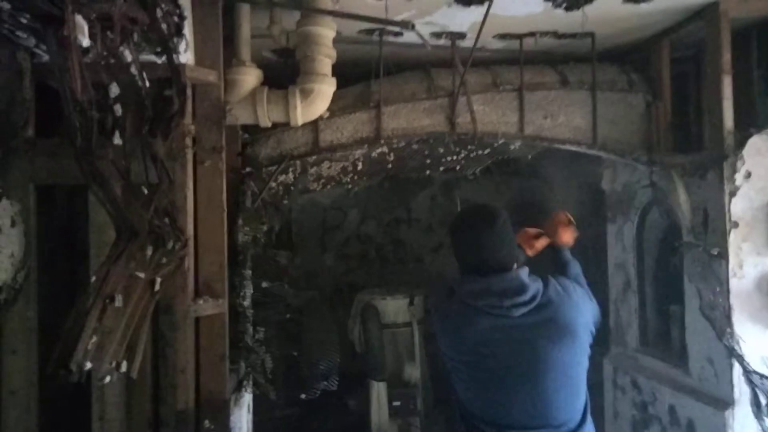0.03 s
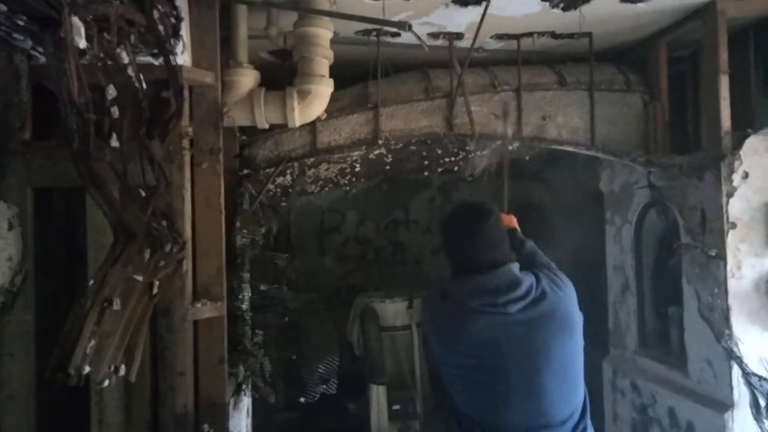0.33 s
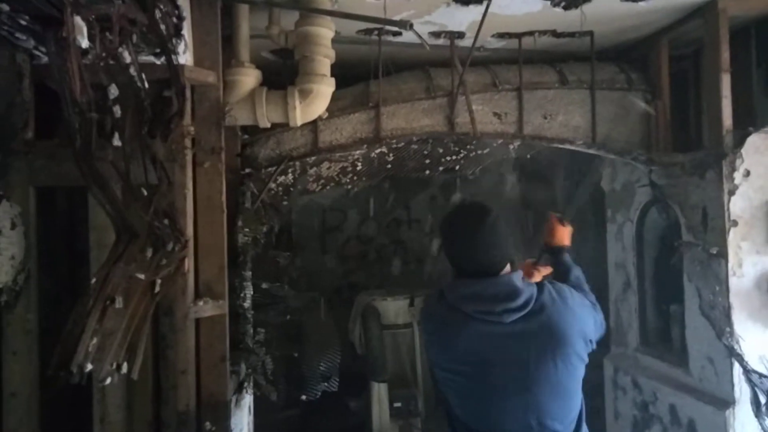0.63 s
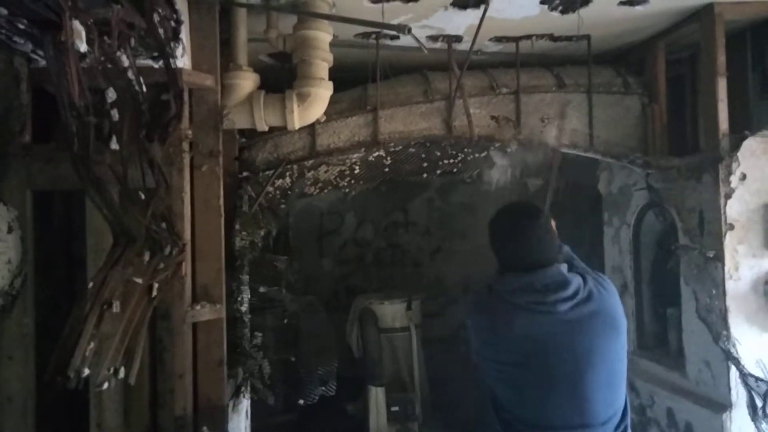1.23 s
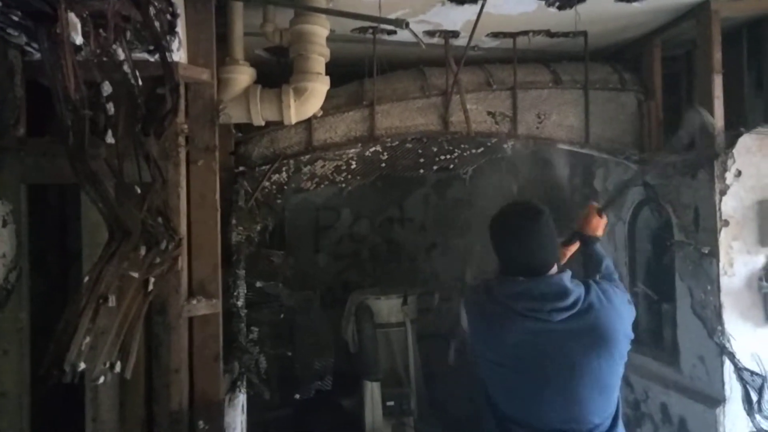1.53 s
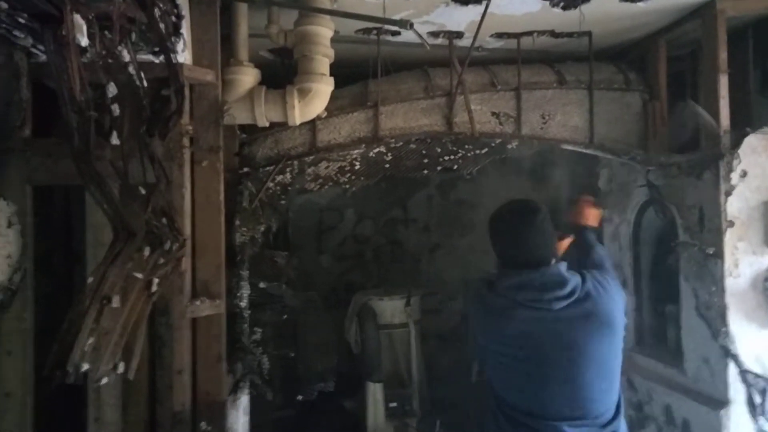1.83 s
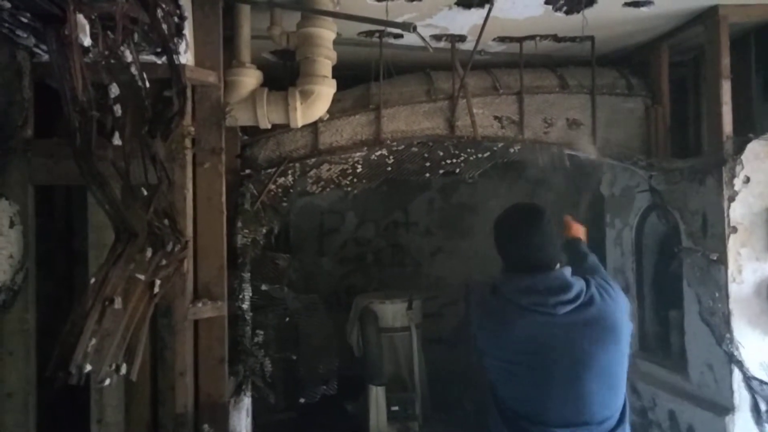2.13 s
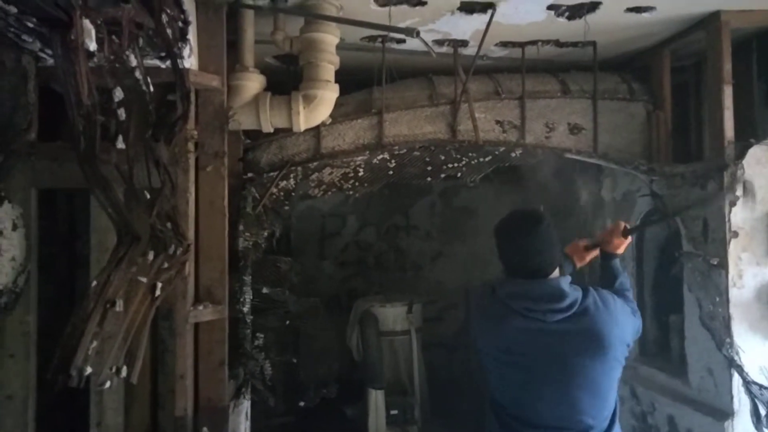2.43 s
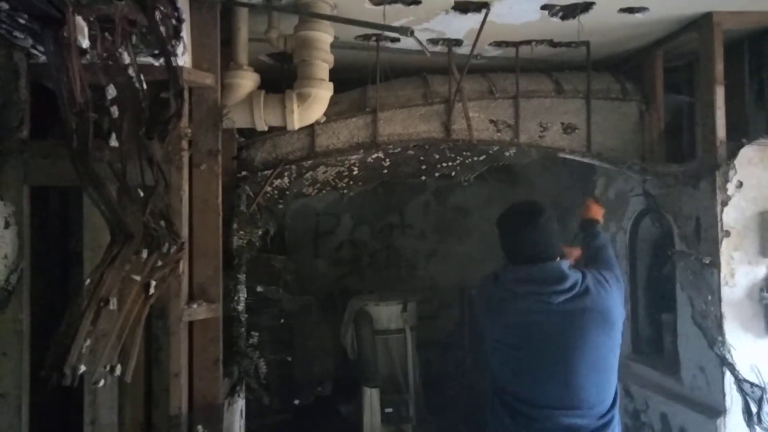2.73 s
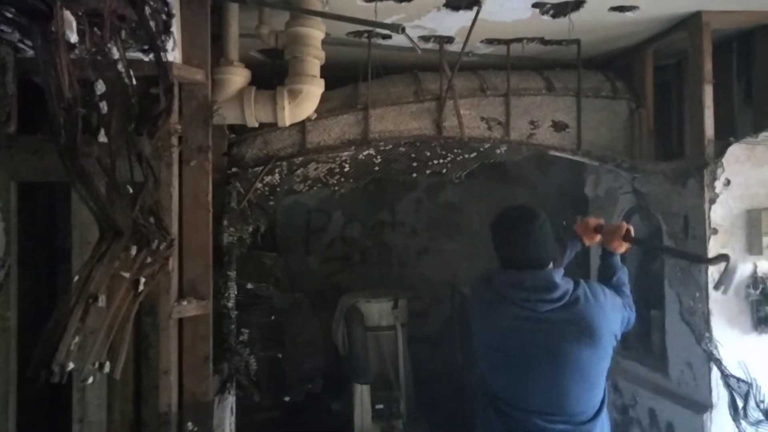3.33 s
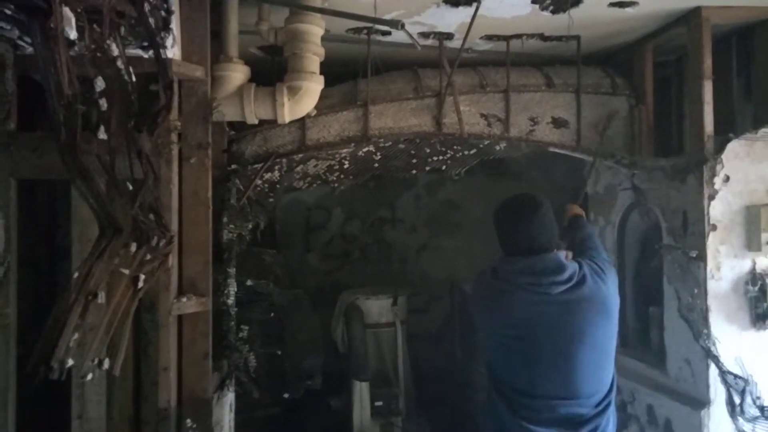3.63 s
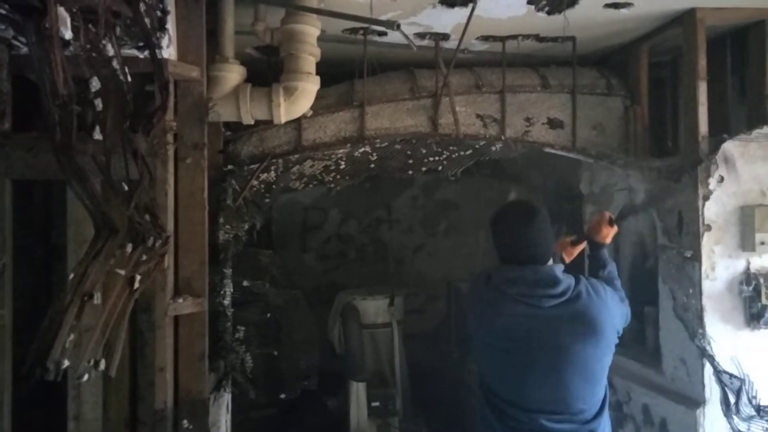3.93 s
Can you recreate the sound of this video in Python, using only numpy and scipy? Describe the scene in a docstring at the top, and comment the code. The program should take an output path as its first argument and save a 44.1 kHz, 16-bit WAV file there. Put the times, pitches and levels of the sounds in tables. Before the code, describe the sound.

A long hand tool crunches and thuds into a plaster wall five times, a little under a second apart. Between blows, lumps shatter on rubble, hard pieces clink and grit trickles down in a bare room.

```python
"""In a bare, derelict room, bits of wall are already falling when a long hand tool hits the plaster.
The blow crunches and thuds, and the masonry rings and booms. Then loosened lumps fall and shatter
on the rubble, hard pieces clink, small chips tick close by and grit trickles down. Four more swings
follow, a little under a second apart; the last three each strike twice in quick succession.
Throughout, the right microphone sounds much brighter than the left."""
import sys
import numpy as np
from scipy import signal
from scipy.fft import rfft, irfft
from scipy.io import wavfile
from scipy.ndimage import uniform_filter1d

SR = 44100
rng = np.random.default_rng(int(sys.argv[2]) if len(sys.argv) > 2 else 0)


def unload_wav(signal):
    """Save mono or channel-first audio to the path in sys.argv[1] as 16-bit WAV at rate SR, clipped to [-1, 1]."""
    wavfile.write(
        sys.argv[1],
        SR,
        np.round(np.clip(np.atleast_2d(signal).T, -1, 1) * 32767).astype(np.int16),
    )


N = 176400
SIZE = 32768  # samples in one event
T, HZ = np.arange(SIZE) / SR, np.fft.rfftfreq(SIZE, 1 / SR)  # its times and frequencies
EVENT_GAIN = np.sqrt(0.03 * SR)  # gives a unit-energy sound the energy of 0.03 s at 0 dB


def blows():
    """The tool crushes and splinters the plaster; the wall thumps, knocks, rings and booms."""
    # Each row: start in seconds, level in dB, bass, crack and treble boosts in dB,
    # pitch of the hollow spot in Hz, knock pitch in Hz, knock boost in dB.
    hits = [(0.3045, -11.5, 1.5, 1, -2, 255, 574, -1), (1.199, -11.5, 3, 4, 4.5, 246, 970, -5.5),
            (2.034, -18.5, 8, -6, 4.5, 193.5, 516, 4), (2.040, -14, 4.5, -1.5, -12.5, 171, 793, 7),
            (2.865, -6.5, -4, 4.5, -12, 354, 497, -13), (2.885, -11.5, -5, -5, -12, 296, 616, -7),
            (3.680, -9, -0.5, -4, -9, 295, 537, 0), (3.700, -11.5, -2, 1, -35, 171.4, 720, -15)]
    # Tone of the crushed plaster. Each row here and in the next three: frequency in Hz, gain in dB.
    crush_tone = [(30, -29), (60, -23), (110, -1), (250, -2), (450, 0.5), (750, 0), (1400, -11.5),
                  (3000, -13.5), (6000, -22), (14000, -43)]
    # The plaster's brittle skin splintering.
    snap_tone = [(800, -10), (2500, -1), (6000, -13), (14000, -8)]
    # The wall's low boom.
    boom_tone = [(30, -43), (70, -12), (125, 0), (210, -3), (330, -5.5), (700, -34), (3000, -60)]
    # The room's deepest notes, which build up last.
    rumble_tone = [(30, -17), (66, 12), (170, -27)]
    thump_hz, crush_s, snap_s = 142.4, 0.0046, 0.0035
    out = np.zeros((2, N))
    for start, db, bass_db, crack_db, treble_db, hollow_hz, knock_hz, knock_db in hits:
        force = 0.75 * norm(pieces(SIZE, per_s=4000, spread_db=3.4) * np.exp(-T / crush_s))
        force[0] -= 1  # the tool's first sharp push
        boost = tone_controls(bass_db, crack_db, treble_db)
        # The masonry gives once under the blow.
        thump = amp(-11.5) * swell(rise_s=0.0054) * np.sin(2 * np.pi * thump_hz * T)
        knock = amp(knock_db) * swell(rise_s=0.0033) * np.sin(2 * np.pi * knock_hz * T)
        ring = wall_ring(hollow_hz)
        boom = amp(-6) * low_noise(boom_tone, rise_s=0.036)
        rumble = amp(-27) * low_noise(rumble_tone, rise_s=0.084)
        wall = colour(thump + knock + ring + boom + rumble, boost)
        crunch = impact(force, along(crush_tone, HZ), boost, room_db=7)
        add(out, start, amp(db) * (crunch + wall))
        splinters = pieces(SIZE, per_s=980, spread_db=5) * np.exp(-T / snap_s)
        snap = impact(splinters, along(snap_tone, HZ), np.zeros_like(HZ), room_db=-0.5)
        add(out, start, amp(db + treble_db - 18.5) * snap)
    return out


def wall_ring(hollow_hz):
    """The wall rings dully, and the loose patch under the tool drums at its own pitch."""
    # The wall's notes. Each row: pitch in Hz, relative level in dB, seconds to fade by 60 dB.
    notes = [(309, 12, 0.17), (425, -3, 0.4), (541, -7, 0.42), (738, -2, 0.55)]
    rise_s = 0.0017
    ring = np.zeros(SIZE)
    for hz, db, fade_s in list(notes) + [(hollow_hz, 8.5, 0.37)]:
        fade = amp(db + rng.normal(0, 1) - 60 * T / fade_s)
        ring += fade * np.sin(2 * np.pi * hz * rng.normal(1, 0.0239) * T)
    return amp(-16) * ring * (1 - np.exp(-T / rise_s))


def low_noise(tone, rise_s):
    """Deep noise that builds up after a blow and dies away."""
    return EVENT_GAIN * norm(colour(rng.standard_normal(SIZE), along(tone, HZ)) * swell(rise_s))


def lumps():
    """Each lump lands with a hollow knock and bursts into a quickly thinning shower of pieces."""
    # Each row: start in seconds, level in dB, break-up time in seconds,
    # bass and treble boosts in dB, knock pitch in Hz.
    landings = [(.001, -16.5, 0.022, 10.5, -2, 517), (.049, -12, 0.056, 11, -1, 800),
                (.075, -13.5, .06, 8, -6, 155), (0.124, -18.5, 0.07, 11, 2, 940),
                (.185, -21, 0.032, 16.5, 4.5, 215), (.38, -25.5, 0.024, 8, 1, 258),
                (.563, -23, 0.038, 1.5, 0, 1790), (.834, -29.5, 0.028, 8, 8.5, 654),
                (0.844, -25.5, 0.027, -13, 1, 840), (.883, -32, 0.03, 19, 11.5, 229),
                (.917, -17.5, 0.025, 0, -5.5, 207), (.983, -16.5, 0.043, 5, 6, 970),
                (1.04, -23, 0.097, 13.5, -1, 830), (1.432, -35.5, 0.011, -1, -13, 1790),
                (1.564, -29, 0.078, 3, -25, 680), (1.594, -28, 0.039, 3, 8, 1250),
                (1.640, -12.5, 0.045, 5.5, -1, 1350), (1.674, -9.5, 0.023, -3, -8.5, 397),
                (1.786, -13.5, 0.011, -1, -18, 1060), (1.815, -9.5, 0.021, -2.5, -0.5, 860),
                (1.874, -20, 0.063, 8.5, -2, 235), (1.953, -16.5, 0.023, 0.5, -2, 212),
                (2.362, -26, 0.044, 0.5, 9.5, 643), (2.42, -27.5, 0.03, -2, -2, 1610),
                (2.690, -24.5, 0.052, 3, 1, 450), (2.729, -22, 0.016, 2, 0.5, 725),
                (2.935, -24, 0.03, 17.5, -2.5, 356), (2.99, -31, 0.028, 8, 6, 480),
                (3.463, -42, 0.065, 3, 16, 755), (3.537, -23.5, 0.035, 1, 1.5, 440),
                (3.601, -28.5, 0.023, 2, 9.5, 616), (3.63, -24, 0.026, -8, 4, 456)]
    # Tone of a breaking lump. Each row: frequency in Hz, gain in dB.
    lump_tone = [(40, -83), (100, -22.5), (190, -4), (330, -2), (600, 1.5), (900, 0.5), (1400, -3.5),
                 (2200, -6), (3200, -10.5), (6000, -15.5), (14000, -32)]
    rise_s, knock_db, knock_width = 0.00033, 8.5, 0.13  # width is a share of the pitch
    thinning = 1.4  # 1 trails off, 2 stops short
    out = np.zeros((2, N))
    for start, db, break_s, bass_db, treble_db, hz in landings:
        envelope = (1 - np.exp(-T / rise_s)) * np.exp(-(T / break_s) ** thinning)
        force = pieces(SIZE, per_s=600, spread_db=5) * envelope
        knock = knock_db / np.sqrt(1 + ((HZ / hz - 1) / knock_width) ** 2)
        boost = tone_controls(bass_db, 0.095 * treble_db, treble_db)
        add(out, start, amp(db) * impact(force, along(lump_tone, HZ) + knock, boost, room_db=1))
    return out


def clinks():
    """Hard pieces land and ring briefly on one slightly rough note."""
    # Each row: start in seconds, level in dB, pitch in Hz, seconds to fade by 60 dB.
    landings = [(0.847, -20.5, 1522, 0.19), (1.787, -12.5, 1087, 0.05), (2.82, -21.5, 3920, 0.038),
                (3.294, -39.5, 5660, .05), (3.341, -40.5, 5970, 0.1), (3.346, -44, 5330, 0.14),
                (3.404, -37, 4660, 0.056), (3.962, -34, 2770, 0.03)]
    rise_s, rough_radians = 0.00066, 0.96
    out = np.zeros((2, N))
    for start, db, hz, fade_s in landings:
        flutter = uniform_filter1d(rng.standard_normal(SIZE), size=100)
        note = np.sin(2 * np.pi * hz * T + rough_radians * flutter / flutter.std())
        envelope = amp(db - 60 * T / fade_s) * (1 - np.exp(-T / rise_s))
        add(out, start, in_room(note * envelope, room_db=-3))
    return out


def chips():
    """Small chips tick close by, each a tiny burst of noise around one pitch."""
    # Each row: start in seconds, level in dB, pitch in Hz.
    ticks = [(0.06, -36, 5970), (.159, -35, 5960), (.278, -35.5, 8120), (0.381, -29.5, 5800),
             (.470, -30.5, 5830), (0.958, -35.5, 6500), (1.025, -34, 5900), (1.596, -33.5, 6130),
             (1.813, -26.5, 6100), (1.953, -32.5, 9300), (2.2, -27.5, 6040), (2.344, -36, 3960),
             (2.363, -30.5, 2060), (2.692, -40, 6270), (2.716, -31.5, 7350), (2.732, -32.5, 4500),
             (2.792, -36.5, 5540), (2.852, -29.5, 4450), (2.887, -34.5, 5950), (3.061, -43.5, 6060),
             (3.537, -27.5, 3000), (3.601, -29.5, 3380), (3.636, -28, 5940), (3.702, -35.5, 5500)]
    width_octaves, floor_db, decay_s = 0.83, -22, 0.0024
    out = np.zeros((2, N))
    for start, db, hz in ticks:
        tone = np.maximum(-6 * (np.log2((HZ + 1) / hz) / width_octaves) ** 2, floor_db)
        force = rng.standard_normal(SIZE) * np.exp(-T / decay_s)
        add(out, start, amp(db) * impact(force, tone, np.zeros_like(HZ), room_db=-0.5))
    return out


def grit():
    """Sand and crumbs trickle down in a rain of tiny clicks."""
    # How loud the trickle is. Each row: time in seconds, relative level in dB.
    levels = [(0, -32.5), (.29, -35.5), (.46, -38), (.63, -45.5), (.81, -62.5), (1.01, -31.5),
              (1.13, -41.5), (1.4, -43.5), (1.56, -46), (1.66, -34), (1.78, -41), (2.0, -36), (2.201, -33),
              (2.42, -48.5), (2.6, -40), (2.86, -34), (3.1, -47.5), (3.399, -53.5), (3.64, -38), (4.0, -46)]
    # Its tone. Each row: frequency in Hz, gain in dB.
    grit_tone = [(200, -8), (700, -4.5), (2000, -9), (5000, -11), (14000, -21)]
    clicks = pieces(N, per_s=170, spread_db=7)
    rain = in_room(colour(clicks, along(grit_tone, HZ)), room_db=1.5)
    level_db = np.interp(np.arange(N) / SR, *np.transpose(levels))
    return rain / rain.std() * amp(level_db + 1.5)


def air():
    """The faint, steady background of the building."""
    # Its tone. Each row: frequency in Hz, gain in dB.
    air_tone = [(25, -14), (70, -6), (120, -3.5), (300, -3.5), (800, -10), (3000, -19), (14000, -34)]
    hush = np.array([colour(side, along(air_tone, HZ)) for side in room_noise(N)])
    return amp(-52) * hush / hush.std()


def in_room(x, room_db):
    """The direct sound plus the room's dense echoes, new for each spot."""
    # How long the room echoes. Each row: frequency in Hz, seconds to fade by 60 dB.
    fade_times = [(60, 0.55), (150, 0.77), (400, 0.64), (1000, 0.45), (2500, 0.46), (6000, 0.43),
                  (14000, 0.39)]
    early_db, early_s, rise_s = 2, 0.0063, 0.0012
    hz, t, spectrum = signal.stft(room_noise(SIZE), SR, nperseg=256)
    fade = amp(-60 * t / along(fade_times, hz)[:, None])
    tail = signal.istft(spectrum * fade, SR, nperseg=256)[1][:, :SIZE]
    early_lift = 1 + amp(early_db) * np.exp(-T / early_s)
    echoes = amp(room_db) * norm(tail * early_lift * (1 - np.exp(-T / rise_s)))
    echoes[:, 0] += 1  # the direct sound
    return signal.fftconvolve(x[None], echoes, axes=1)[:, :len(x)]


def room_noise(size):
    """Stereo noise whose two sides are alike in the bass and much less so in the treble."""
    # Each row: frequency in Hz, likeness of left and right (0 unrelated, 1 the same).
    likeness = [(60, 0.95), (150, 0.97), (280, 0.89), (500, 0.76), (1000, 0.44), (2000, 0), (5000, 0.44)]
    angle = np.arccos(np.clip(along(likeness, np.fft.rfftfreq(size, 1 / SR)), -1, 1)) / 2
    mid, side = irfft(rfft(rng.standard_normal((2, size))) * [np.cos(angle), np.sin(angle)], size)
    return np.array([mid + side, mid - side])


def impact(force, tone, boost, room_db):
    """A contact force heard through its material and the room."""
    pair = EVENT_GAIN * norm(in_room(colour(force, tone), room_db))
    return np.array([colour(side, boost) for side in pair])


def pieces(size, per_s, spread_db):
    """A shower of mixed sizes: each size clicks about per_s times a second in its own pitch range."""
    # Each entry: the pitch in Hz of one size of piece.
    pitches = [700, 2000, 4000, 6500, 9500, 14000]
    hz = np.fft.rfftfreq(size, 1 / SR)
    bands = [np.sqrt(np.interp(hz, pitches, share)) for share in np.eye(len(pitches))]
    return sum(irfft(rfft(grains(size, per_s, spread_db)) * band, size) for band in bands)


def grains(size, per_s, spread_db):
    """Random tiny contacts of uneven strength."""
    chance, strength = rng.random(size), rng.standard_normal(size)
    return (chance < per_s / SR) * rng.choice([-1, 1], size) * amp(spread_db * np.clip(strength, -2, 2))


def swell(rise_s):
    """A loudness curve that peaks at 1 after rise_s and then dies away."""
    return T / rise_s * np.exp(1 - T / rise_s)


def tone_controls(bass_db, crack_db, treble_db):
    """A curve in dB that turns the bass, upper middle (crack) and treble up or down."""
    return along([(200, bass_db), (480, 0), (800, 0), (1500, crack_db), (4000, treble_db)], HZ)


def colour(x, db):
    """Filter x with one gain in dB for each frequency in HZ."""
    cepstrum = irfft(db * np.log(10) / 20)
    # Folding it forward in time keeps the filter from ringing before a hit.
    cepstrum[1:SIZE // 2] *= 2
    cepstrum[SIZE // 2 + 1:] = 0
    response = irfft(np.exp(rfft(cepstrum)))[:SIZE // 8]
    return signal.fftconvolve(x, response)[:len(x)]


def along(points, hz):
    """Read between (Hz, value) points on a logarithmic frequency scale."""
    freqs, values = np.transpose(points)
    return np.interp(np.log(hz + 1), np.log(freqs + 1), values)


def amp(db):
    """Turn decibels into a gain."""
    return 10 ** (np.asarray(db) / 20)


def norm(x):
    """Scale to an average energy of 1 per channel."""
    return x / np.sqrt(np.mean(np.sum(x ** 2, axis=-1)) + 1e-20)


def add(out, start_s, x):
    """Mix x into out from start_s on."""
    i = max(round(start_s * SR), 0)
    out[:, i:i + x.shape[-1]] += x[..., :N - i]


def scene():
    """Blows and debris over the background."""
    return blows() + lumps() + clinks() + chips() + grit() + air()


def record(dry):
    """Two unlike microphones; loud peaks are rounded off and the highest treble is cut."""
    # The dull left microphone. Each row: frequency in Hz, gain in dB.
    left_mic = [(300, -3), (800, -0.05), (1600, 0), (2200, 1), (3200, -1), (5000, -2), (6300, -20.5),
                (7300, -12), (9000, -18), (13000, -22), (15500, -41)]
    # The bright right microphone, with the same columns.
    right_mic = [(300, -3), (800, -1.17), (1600, 1.5), (2250, 8.5), (3100, 0), (5000, 5), (6400, 10.5),
                 (7300, -3), (8600, -10.5), (10500, -2.5), (13000, 4.5), (15500, -3.5)]
    ceiling, top_hz = 0.88, 15600
    pair = np.array([colour(side, along(mic, HZ)) for side, mic in zip(dry, (left_mic, right_mic))])
    rounded = pair / (1 + np.abs(pair / ceiling) ** 6) ** (1 / 6)
    passband = np.fft.rfftfreq(2 * N, 1 / SR) < top_hz
    return irfft(rfft(rounded, 2 * N) * passband)[:, :N]


dry = scene()
out = record(dry)
unload_wav(out)
```